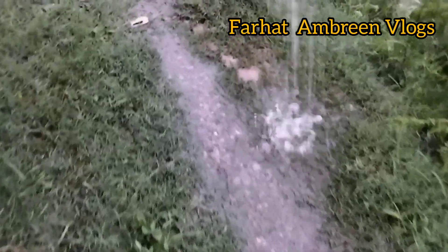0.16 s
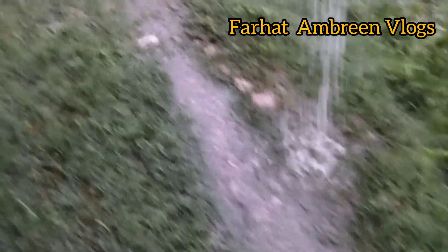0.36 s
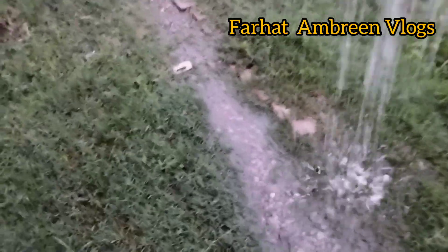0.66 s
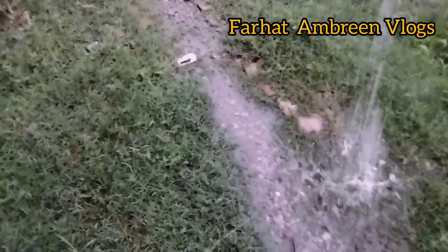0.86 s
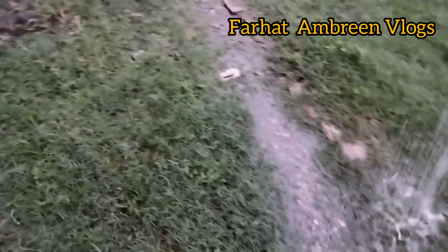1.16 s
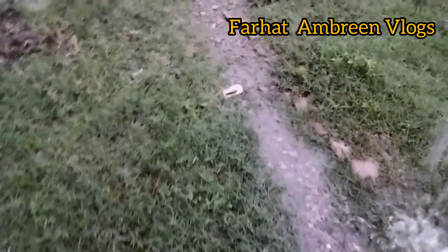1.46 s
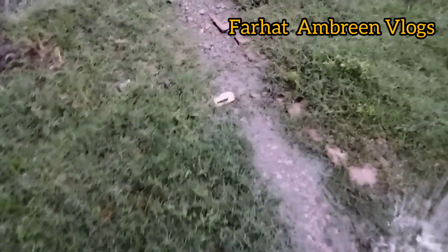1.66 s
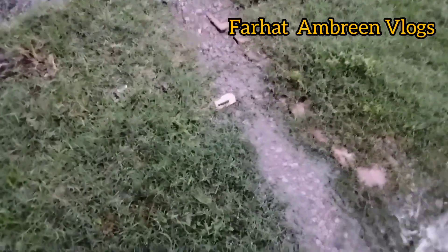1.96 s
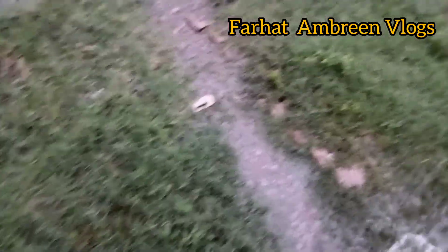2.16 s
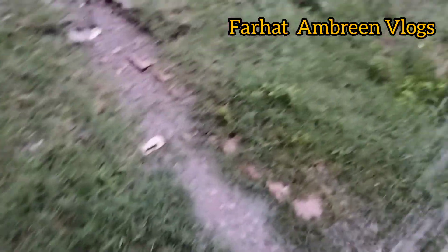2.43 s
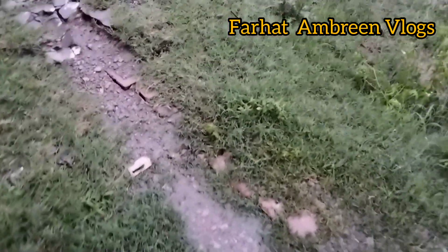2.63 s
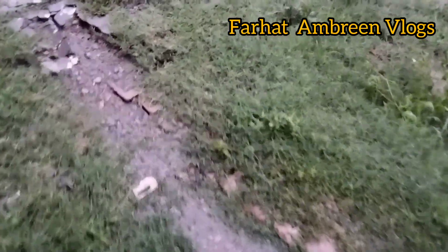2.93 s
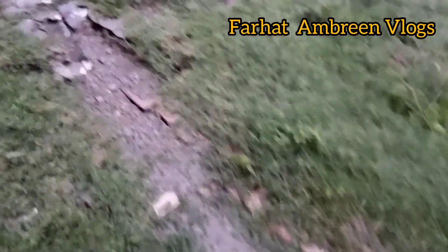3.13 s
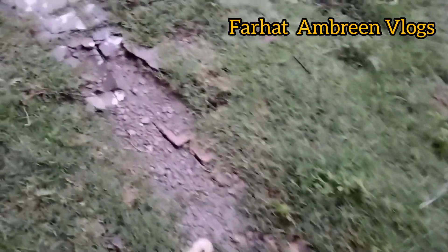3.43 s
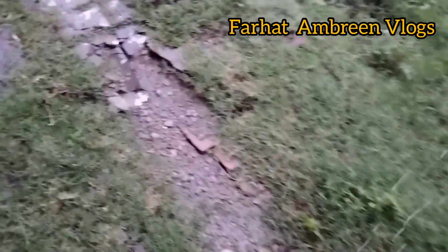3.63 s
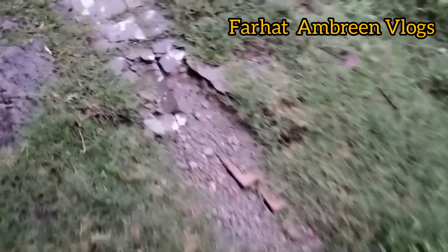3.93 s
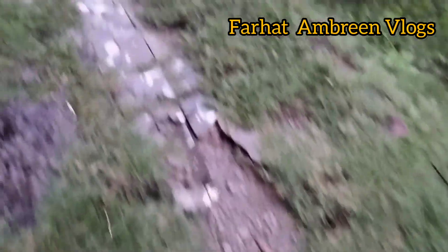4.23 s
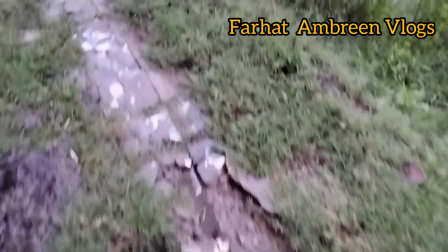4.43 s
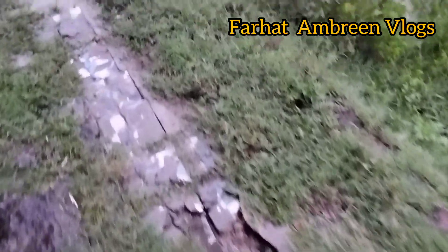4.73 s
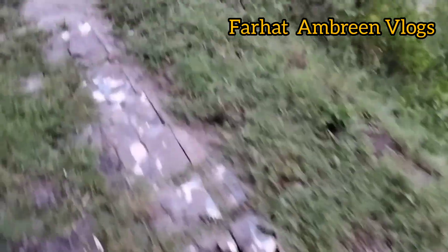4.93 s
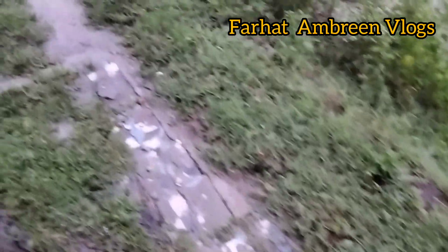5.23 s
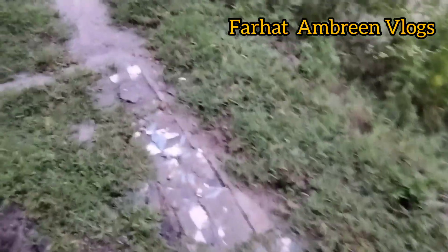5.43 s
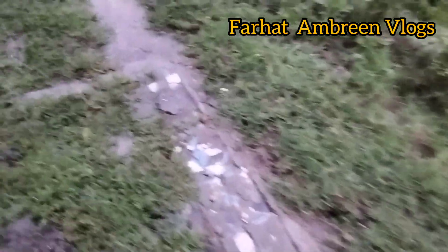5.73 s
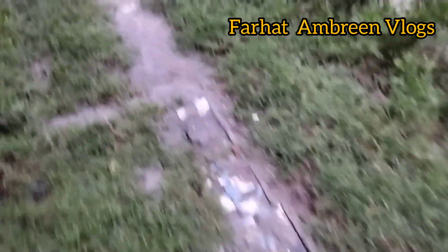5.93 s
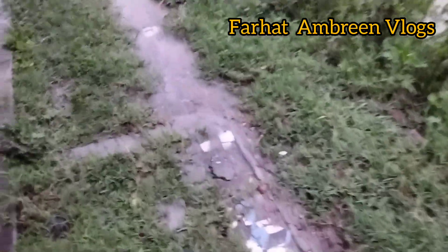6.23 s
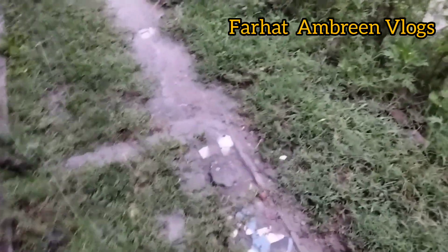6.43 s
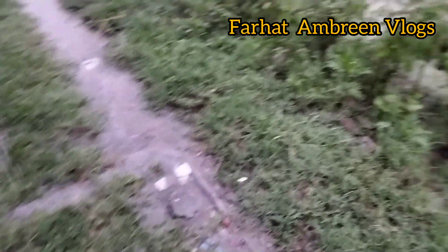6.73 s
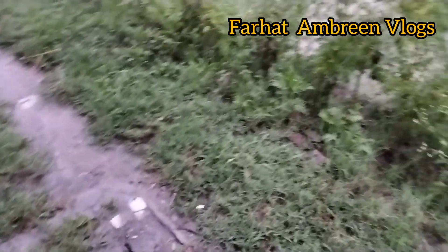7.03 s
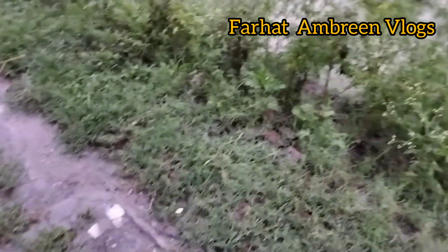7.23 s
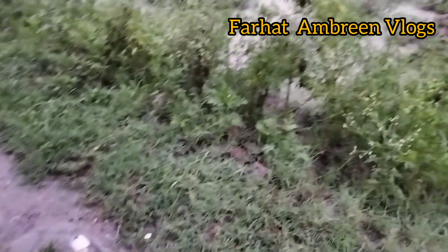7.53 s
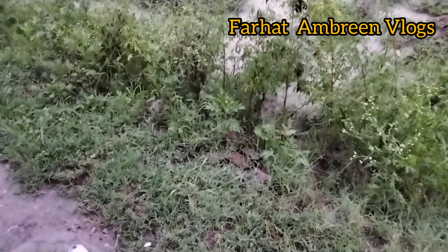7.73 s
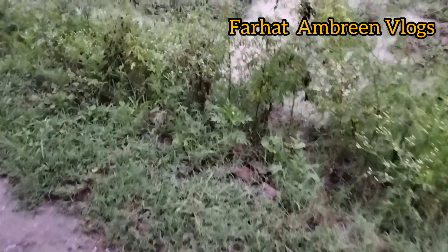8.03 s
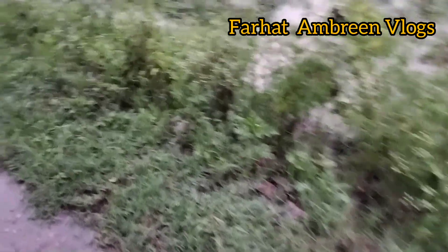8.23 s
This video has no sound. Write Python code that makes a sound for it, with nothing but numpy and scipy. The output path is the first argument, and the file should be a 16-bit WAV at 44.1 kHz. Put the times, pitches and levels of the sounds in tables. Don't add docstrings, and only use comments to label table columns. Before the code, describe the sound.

Roof runoff splatters hard on wet ground in heavy rain, drums loudly on something hollow, then fades to scattered slaps and drips.

```python
import sys
import numpy as np
from scipy import signal
from scipy.io import wavfile
from scipy.ndimage import uniform_filter1d

SR = 44100
rng = np.random.default_rng(int(sys.argv[2]) if len(sys.argv) > 2 else 0)


def master(y):
    cut = np.clip(np.atleast_2d(y).T, -1, 1)
    pcm = np.round(cut * 32767)
    wavfile.write(sys.argv[1], SR, pcm.astype(np.int16))


def gain_from_decibels(decibels):
    exponent = np.asarray(decibels, float) / 20
    return 10 ** exponent


N = 369116
TIME = np.arange(N) / SR

# time in seconds, low roar in dB, left over right in
# dB, brightness of the top in dB.
WEATHER = [(0.0, -20.5, -8, 5.5), (1.28, -27.5, -5, -0.9), (2.26, -28.5, -3.5, 1.5), (2.56, -18, -3.5, -2),
           (2.8, -23, -6.5, -8.5), (2.91, -14, -5.5, -10), (3.1, -25.5, -7.5, -4), (3.47, -21, -9, -6.5),
           (3.82, -28.5, -8, -2), (4.08, -30.5, -8, 4), (6.15, -31, -7, 5), (8.37, -30.5, -8, 1.5)]
# time in seconds, share that lands on the hollow thing (0-1),
# lag of the left port in samples.
AIM = [
    (0, 0, 2.5),
    (1.9, 0, 5),
    (2.08, 0.55, 3),
    (3.85, 0.25, 15.5),
    (4.0, 0.02, 6.5),
    (4.6, 0, -8.5),
    (8.37, 0.6, -10.5),
]


def evened(x):
    return x / np.sqrt(np.mean(x ** 2) + 1e-20)


def curve(rows, column):
    rows = np.asarray(rows)
    return np.interp(TIME, rows[:, 0], rows[:, column])


def colour(x, points):
    hz, db = np.transpose(points)
    bins_hz = abs(np.fft.fftfreq(8192, 1 / SR)) + 1
    gain_db = np.interp(np.log(bins_hz), np.log(hz), np.maximum(db, -100))
    log_gain = np.log(gain_from_decibels(gain_db))
    taps = np.fft.ifft(np.exp(np.conj(signal.hilbert(log_gain)))).real[:4096]
    taps = taps.reshape((1,) * (x.ndim - 1) + (-1,))
    return signal.oaconvolve(x, taps, axes=-1)[..., :N]


def drops(per_s, size_db, spread):
    chance, sign, place = rng.random((3, N))
    size = gain_from_decibels(size_db * np.minimum(rng.exponential(1, N), 3.2))
    clicks = size * np.sign(sign - 0.5) * (chance < per_s / SR)
    lag = np.round(curve(AIM, column=2) + spread * (2 * place - 1)).astype(int)
    left = np.bincount(np.clip(np.arange(N) + lag, 0, N - 1), clicks, N)
    return evened(np.array([left, clicks]))


def scatter(x, t60, wet_db, same):
    keep = gain_from_decibels(-120 / (t60 * SR))
    puff = np.sqrt(signal.lfilter([1 - keep], [1, -keep], x ** 2))
    common, left, right = rng.standard_normal((3, N))
    same = np.clip(same, 0, 1)
    lag = np.round(curve(AIM, column=2)).astype(int)
    late = common[np.clip(np.arange(N) - lag, 0, N - 1)]
    noise = same * np.array([late, common]) + np.sqrt(1 - same ** 2) * np.array([left, right])
    return evened(x + gain_from_decibels(wet_db) * puff * noise)


def patchy(x, patch_db):
    z = signal.stft(x, nperseg=512, noverlap=384)[2]
    field = rng.standard_normal(z.shape[1:])
    field = uniform_filter1d(field, size=7, axis=0)
    field = evened(uniform_filter1d(field, size=4, axis=1))
    return signal.istft(z * gain_from_decibels(patch_db * field), nperseg=512, noverlap=384)[1][:, :N]


def brighten(x):
    top = signal.sosfilt(signal.butter(1, [5800, 17000], "band", fs=SR, output="sos"), x)
    return x + (gain_from_decibels(curve(WEATHER, column=3)) - 1) * top


def rumble():
    # frequency in Hz, level in dB per Hz.
    roar_spectrum = [(12, -82), (22, 3), (38, 5.5), (130, 0.5), (215, 0.5), (468, -17), (900, -42),
                     (1170, -28), (1980, -120)]
    same, left, right = rng.standard_normal((3, N))
    both = same + 0.16 * np.array([left, right])
    return gain_from_decibels(curve(WEATHER, column=1) - 4.0) * evened(colour(both, roar_spectrum))


def rain():
    # frequency in Hz, level in dB per Hz.
    leaf_spectrum = [(200, -13), (500, -14.5), (1200, -14), (2500, -8.5), (5000, -8), (9000, -4),
                     (15000, -6.5)]
    calm_db, rain_db, follows = -28.5, -18.5, 0.28
    patter = scatter(drops(7000, size_db=6.5, spread=20), t60=0.054, wet_db=7.5, same=0.15)
    level_db = rain_db + follows * (curve(WEATHER, column=1) - calm_db) + 2.5
    return gain_from_decibels(level_db) * colour(patter, leaf_spectrum)


def slugs():
    # start in seconds, spray in dB, length in ms, body in dB.
    near_slugs = [(.04, -26.5, 59, -25), (.109, -23.5, 52, -33), (.23, -23.5, 32, -24),
                  (0.294, -19.5, 80, -29), (.388, -20, 42, -42), (.439, -17, 43, -38), (.527, -19, 55, -42),
                  (0.605, -15.5, 50, -27.5), (0.71, -18, 28, -50), (.765, -12, 19, -50),
                  (0.816, -15, 13, -45), (.87, -16, 49, -45), (.923, -14, 20, -22), (0.977, -16, 58, -48),
                  (1.016, -18.5, 62, -26.5), (1.1, -10.5, 11, -22), (1.141, -17.5, 40, -48),
                  (1.201, -18, 88, -27.5), (1.304, -19.5, 74, -29.5), (1.378, -14, 21.5, -22.5),
                  (1.415, -17.5, 110, -47), (1.494, -14, 14, -18), (1.545, -17, 53, -24),
                  (1.625, -12.5, 36, -31.5), (1.679, -18, 84, -31), (1.758, -14, 50, -41),
                  (1.85, -15.5, 69, -31), (1.944, -15.5, 30, -29.5), (2.007, -17, 125, -30.5),
                  (2.104, -17.5, 57, -27)]
    # start in seconds, body in dB, length in ms, spray in dB.
    hollow_slugs = [(2.191, -18, 8.1, -12.5), (2.226, -33, 47, -19.5), (2.302, -22, 69, -17),
                    (2.382, -13.5, 4.4, -9), (2.42, -17.5, 67, -17.5), (2.493, -16.5, 32, -18),
                    (2.549, -14.5, 34, -15.5), (2.598, -17.5, 44, -19.5), (2.652, -8, 9.9, -13),
                    (2.682, -18, 98, -32), (2.815, -17, 64, -22), (2.845, -17.5, 100, -25),
                    (2.926, -13.5, 34, -30), (2.961, -8.5, 25, -14.5), (3.002, -17, 13, -28),
                    (3.05, -10.5, 22, -19), (3.106, -16.5, 200, -35), (3.233, -18, 28, -18),
                    (3.278, -18, 67, -34), (3.339, -14, 12, -26), (3.366, -14, 18, -21),
                    (3.402, -13, 48, -21), (3.457, -13, 30, -32), (3.503, -8.5, 9, -20),
                    (3.538, -8.5, 11, -25), (3.572, -13.5, 88, -27), (3.638, -19, 63, -38),
                    (3.722, -17.5, 31, -41), (3.839, -19.5, 38, -18), (3.888, -26.5, 72, -19.5)]
    # start in seconds, spray in dB, length in ms.
    far_slugs = [(3.981, -22, 110), (4.11, -21.5, 36), (4.228, -23, 44), (4.298, -19.5, 38),
                 (4.35, -22.5, 92), (4.501, -24, 58), (4.6, -16.5, 5.2), (4.663, -20.5, 26),
                 (4.759, -18.5, 22), (4.899, -23.5, 103), (5.017, -20.5, 20), (5.065, -20.5, 60),
                 (5.167, -17.5, 32), (5.249, -23, 99), (5.377, -18, 21), (5.498, -22, 32),
                 (5.594, -19.5, 22), (5.637, -19.5, 53), (5.794, -16.5, 28), (5.957, -21, 35),
                 (6.066, -22, 28), (6.157, -24.5, 27), (6.307, -24, 13), (6.457, -22, 41), (6.561, -21, 22),
                 (7.423, -31, 44), (7.534, -25.5, 49), (7.816, -24, 7.8), (7.88, -22, 20),
                 (8.052, -29, 100)]
    # time in seconds, level in dB.
    dribble_level = [
        (0, -49),
        (2.3, -41),
        (2.7, -56),
        (3.8, -50),
        (4.1, -29.5),
        (5.7, -33),
        (6.2, -30),
        (8.37, -26),
    ]
    near = np.array(near_slugs)[:, [0, 1, 3, 2]]
    hollow = np.array(hollow_slugs)[:, [0, 3, 1, 2]]
    s, spray_db, ms = np.transpose(far_slugs)
    plop_db = -15.5 + 1.5 * np.log2(ms / 10)
    far = np.transpose([s, spray_db, spray_db + plop_db, ms])

    gap, size, body, length = rng.standard_normal((400, 4)).T
    s = np.cumsum(np.exp(0.5 * gap)) / 26
    level_db = np.interp(s, *np.transpose(dribble_level))
    spray_db = level_db + 2.5 * np.clip(size, -2, 0.2)
    body_db = level_db - 7.5 + 1.5 * body
    small = np.transpose([s, spray_db, body_db, 22 * np.exp(0.5 * length)])
    return np.vstack([near, hollow, far, small[s < N / SR]])


def flow(rows, column, rise, fall):
    hold_share, lump_db, lump_ms = 0.84, 1.22, 13
    power, t = np.zeros(N), np.arange(8000) / SR
    for row in rows:
        after_hold = np.maximum(t - row[3] * hold_share / 1000, 0)
        shape = (1 - np.exp(-t / rise)) * np.exp(-after_hold / fall)
        part = power[round(row[0] * SR):][:len(t)]
        part += gain_from_decibels(2 * row[column]) * shape[:len(part)]
    width = round(lump_ms * SR / 1000)
    lumps = uniform_filter1d(rng.standard_normal(N), width)
    lumps = evened(uniform_filter1d(lumps, width))
    return np.sqrt(power) * gain_from_decibels(lump_db * np.clip(lumps, -3, 1.5))


def breaks():
    # end in seconds, length in ms, depth in dB.
    gaps = [(0.976, 14, -6), (1.547, 27, -3), (2.177, 15, -2), (2.225, 9.3, -2), (2.422, 7.5, -4),
            (2.816, 41, -3), (3.035, 20, -3), (3.37, 12, -5), (3.504, 13, -5), (3.979, 12, -7),
            (4.228, 15, -6), (4.299, 8.3, -4), (4.76, 25, -3), (5.148, 27, -3), (5.595, 16, -6),
            (7.025, 18, -1)]
    db = np.zeros(N)
    for end, ms, depth_db in gaps:
        sink = np.clip((TIME - end + ms / 1000) / 0.004, 0, 1)
        db += depth_db * sink * (TIME < end)
    return gain_from_decibels(db)


def drumming(rows):
    # frequency in Hz, level in dB per Hz.
    drum_spectrum = [(30, -5), (120, -14), (330, -1.3), (600, -4.5), (1000, -8), (2000, -12.5),
                     (4000, -17.5), (8000, -51)]
    # time in seconds, peak in dB, pitch in Hz.
    blows = [(2.071, -11.5, 388), (2.199, -13, 456), (2.2256, -15, 446), (2.3297, -15.5, 500.0),
             (2.3848, -9, 670.0), (2.4097, -10.5, 406), (2.425, -18, 585), (2.4574, -18, 440),
             (2.4661, -11, 370.0), (2.48, -13, 476), (2.4966, -15, 267), (2.511, -9, 260.0),
             (2.564, -8, 340.0), (2.5824, -17, 406), (2.592, -13, 430.0), (2.6021, -6, 430.0),
             (2.6328, -14, 420.0), (2.6439, -16, 398), (2.6589, -15, 540), (2.6677, -9, 350.0),
             (2.6842, -12, 350.0), (2.7028, -14, 450.0), (2.729, -5, 600), (2.7604, -19, 566),
             (2.7915, -16, 290.0), (2.819, -10, 350.0), (2.8352, -14, 650.0), (2.845, -12, 500.0),
             (2.8552, -10, 550.0), (2.8688, -19, 350.0), (2.8836, -12, 294), (2.8934, -13, 300.0),
             (2.915, -9.5, 322), (2.9265, -16, 290.0), (2.933, -14, 260.0), (2.9454, -20, 280.0),
             (2.9613, -7, 334), (2.9848, -16, 330.0), (3.004, -16, 490.0), (3.036, -13, 330.0),
             (3.0447, -15, 440.0), (3.053, -11, 493), (3.061, -14, 465), (3.0813, -15, 350.0),
             (3.15, -17, 443), (3.2063, -15, 390.0), (3.242, -13, 288), (3.3098, -14, 310.0),
             (3.3718, -7.5, 350.0), (3.404, -16, 330.0), (3.4113, -14, 370.0), (3.4339, -11, 356),
             (3.4632, -11.5, 348), (3.4775, -13, 620.0), (3.5097, -12, 470.0), (3.5442, -15.5, 370.0),
             (3.5874, -14, 400.0), (3.596, -9.5, 630.0), (3.643, -5.5, 366), (3.652, -14, 462)]
    knocks = scatter(drops(420, size_db=-1.0, spread=6.5), t60=0.02, wet_db=7.0, same=0.9)
    knocks = patchy(evened(colour(knocks, drum_spectrum)), patch_db=-0.5)
    share = np.clip(curve(AIM, column=1), 0, 1)
    out = gain_from_decibels(-2.5) * knocks * flow(rows, column=2, rise=0.0007, fall=0.012) * np.sqrt(share)
    t = np.arange(1500) / SR
    for s, db, hz in blows:
        ring = np.sin(2 * np.pi * hz * t) * np.exp(-t * hz / 0.82)
        overtone = 0.5 * np.sin(2 * np.pi * (1.97 * hz + 300) * t) * np.exp(-t / 0.0012)
        crack = 0.31 * rng.standard_normal(len(t)) * np.exp(-t / 0.0009)
        blow = gain_from_decibels(db + 3.0) * (ring + overtone + crack)
        at = round(s * SR)
        out[0, at + 9:][:1500] += blow
        out[1, at:][:1500] += blow
    return out


def bubble(hz, cycles):
    t = np.arange(1200) / SR
    tone = np.sin(2 * np.pi * hz * t * (1 + 4 * t))
    return tone * np.exp(-t * hz / cycles) * (1 - np.exp(-t / 0.00024))


def plops(rows):
    # time in seconds,
    # peak in dB, pitch in Hz.
    gulps = [(0.017, -20.5, 1220), (0.045, -23, 1480), (0.135, -14, 1490), (0.159, -16, 1430),
             (0.19, -17, 1250), (0.231, -25, 1420), (0.352, -25, 736), (0.462, -21, 1000),
             (0.538, -23, 1490), (0.614, -21, 1250), (0.928, -26, 1690), (0.993, -21, 1520),
             (1.018, -34, 1660), (1.035, -15.5, 1490), (1.104, -21, 1490), (1.246, -13.5, 1650),
             (1.275, -27, 800), (1.32, -24, 980), (1.358, -31, 760), (1.383, -28, 1430), (1.498, -24, 706),
             (1.55, -16.5, 1420), (1.575, -34, 800), (1.79, -26, 750), (1.955, -17, 861),
             (2.075, -15, 1490), (2.099, -12.5, 1650), (2.131, -24, 1360),
             (4.228, -25, 1220), (4.255, -24, 1230), (4.298, -25, 1960), (4.416, -23, 2000),
                 (4.493, -29, 1810), (4.586, -31, 1830), (4.668, -28, 1950), (5.056, -19, 1940),
                 (5.107, -15.5, 1450), (5.267, -26, 2000), (5.504, -25, 1410), (5.605, -26, 1800),
                 (5.68, -28, 1600), (5.71, -26, 1370), (5.768, -33, 1730), (5.899, -27, 864),
                 (6.344, -35, 606), (6.369, -24, 1960), (6.457, -33, 848), (6.563, -30, 1930),
                 (6.69, -30, 1010), (6.864, -27, 1700), (7.17, -24, 1550), (7.199, -29, 1460),
                 (7.277, -20, 1990), (7.444, -26, 1550), (7.535, -29, 1980), (7.609, -27, 1980),
                 (7.789, -23, 1600), (7.86, -30, 1800)]
    # time in seconds, peak in dB, pitch in Hz.
    blips = [(6.259, -29, 2700), (6.308, -31, 3300), (6.381, -24, 2770.0), (6.421, -22, 3200),
             (6.527, -27, 2990.0), (6.604, -23, 2800), (6.674, -19, 3570), (6.823, -29, 2450.0),
             (7.004, -25, 3080.0), (7.168, -26, 3340.0), (7.215, -27, 3120.0), (7.286, -24, 2720.0),
             (7.321, -24, 2720), (7.387, -25, 2500.0), (7.542, -28, 2750.0), (7.669, -26, 2740),
             (7.711, -24, 2570), (7.882, -32, 3120), (8.061, -28, 2620.0), (8.09, -24, 2670.0)]
    out = np.zeros((2, N))
    for hz in (730, 980, 1250, 1490, 1786, 2085, 2284, 2600, 2890):
        ring = bubble(hz, cycles=hz / 380)
        ring = ring[None] / np.linalg.norm(ring)
        out += signal.oaconvolve(drops(50, size_db=2.0, spread=15.0), ring, axes=1)[:, :N]
    on_ground = np.clip(1 - curve(AIM, column=1), 0, 1)
    out = gain_from_decibels(-6.5) * evened(out) * flow(rows, column=2, rise=0.00068, fall=0.0018) * on_ground ** 2
    for s, db, hz in gulps:
        at = round(s * SR)
        out[0, at + 12:][:1200] += gain_from_decibels(db - 9) * bubble(hz, cycles=1.4)
        out[1, at:][:1200] += gain_from_decibels(db + 6.0) * bubble(hz, cycles=2.1)
    for s, db, hz in blips:
        out[:, round(s * SR):][:, :1200] += gain_from_decibels(db + 0.5) * bubble(hz, cycles=11.0)
    return out


def fizz(per_s, size_db, spread, t60, wet_db):
    out = 1.26 * scatter(drops(per_s, size_db, spread), t60, wet_db, same=1.0)
    for hz in np.geomspace(900, 12000, num=6):
        band = signal.butter(1, [hz / 1.2, hz * 1.34], "band", fs=SR, output="sos")
        droplets = drops(per_s * hz / 12000, size_db, spread)
        out += signal.sosfilt(band, scatter(droplets, t60, wet_db, same=0.099))
    return evened(out)


def spray(rows):
    # frequency in Hz, level in dB per Hz.
    spray_spectrum = [(200, -21), (600, -58), (1200, -18.5), (2500, -2.5), (5000, 0.8), (9000, 2.5),
                      (15000, 0.5)]
    # time in seconds, peak in dB.
    near_slaps = [(0.0795, -4), (0.1087, -8), (0.1351, -7), (0.162, -9), (0.1895, -10), (0.232, -3),
                  (0.3012, -10), (0.3243, -5), (0.4105, -7), (0.4419, -9), (0.5297, -7), (0.607, -6),
                  (0.6848, -22), (0.7108, -14), (0.7257, -5), (0.772, -1), (0.818, -6), (0.8583, -1),
                  (0.8719, -2), (0.929, -7), (0.976, -10), (1.017, 0), (1.056, -6), (1.1036, -6),
                  (1.1458, -11), (1.2043, 0), (1.2451, -19), (1.3175, 1), (1.3818, -13), (1.4661, -11),
                  (1.4965, -8), (1.5474, -7), (1.5918, 5), (1.627, -4), (1.7203, -10), (1.7586, -4),
                  (1.8432, -20), (1.8532, -3), (1.9445, -17), (2.0083, -10), (2.055, -10)]
    # time in seconds, peak in dB.
    hollow_slaps = [(2.1756, -3), (2.1944, -8), (2.226, -2), (2.3005, -1), (2.3843, -11), (2.4222, -3),
                    (2.4681, -15), (2.5095, -9), (2.5474, -6), (2.5983, -14), (2.6432, -16), (2.6574, -9),
                    (2.7465, -16), (2.7904, -26), (2.8176, 1), (2.8542, -7), (2.9261, -1), (2.962, -4),
                    (3.0343, -2), (3.0513, -8), (3.1057, -16), (3.1491, -7), (3.2384, -13), (3.2907, -12),
                    (3.3105, -8), (3.3424, 1), (3.3711, -11), (3.4075, -14), (3.456, -8), (3.5048, -13),
                    (3.5387, -12), (3.5955, -6), (3.6404, -17), (3.7218, -27), (3.8355, -11), (3.845, -9),
                    (3.8909, -13)]
    # time in seconds, peak in dB.
    far_slaps = [(3.8914, -7), (3.98, -16), (4.0151, -14), (4.1103, -4), (4.2106, -17), (4.2275, 0),
                 (4.256, -12), (4.301, -8), (4.3615, -2), (4.47, -8), (4.498, -2.5), (4.5808, -6),
                 (4.6004, -10), (4.6701, -12), (4.6994, -7), (4.726, -6), (4.7614, -10), (4.823, -2.5),
                 (4.9066, -3), (4.961, -8), (5.0198, -11), (5.0664, -17), (5.106, -6), (5.1473, -5),
                 (5.1739, -16), (5.2557, -6), (5.3126, -9), (5.345, -7), (5.379, -18), (5.396, -7),
                 (5.4634, -12), (5.5077, 0.5), (5.596, -14), (5.6442, -4), (5.6986, -6), (5.7776, -11),
                 (5.797, -11), (5.8549, -18), (5.9108, -9.5), (5.9456, -7), (6.045, -19), (6.0688, -8),
                 (6.1197, -10), (6.1647, -10), (6.209, -2), (6.31, -7), (6.46, -14), (6.5243, -9),
                 (6.5608, -15), (6.671, -10), (6.7653, -16), (6.8317, -11), (7.3889, -16), (7.4253, -27),
                 (7.5435, -5), (7.6693, -10), (7.817, -9), (7.8804, -10), (8.0673, -8), (8.222, -5)]
    crackle = fizz(2200, size_db=4.0, spread=10.5, t60=0.012, wet_db=0.0)
    crackle *= flow(rows, column=1, rise=0.0009, fall=0.0043)
    slaps, t = np.zeros((2, N)), np.arange(600) / SR
    shape = np.exp(-t / 0.0005) + 0.4 * np.exp(-t / 0.004)
    for s, db in near_slaps + hollow_slaps + far_slaps:
        burst = rng.standard_normal((2, 600)) * shape
        burst = burst + 0.14 * burst[::-1]
        slaps[:, round(s * SR):][:, :600] += gain_from_decibels(db - 5.5) * burst
    slaps = signal.sosfilt(signal.butter(1, 2600, "high", fs=SR, output="sos"), slaps)
    return gain_from_decibels(1.2) * colour(gain_from_decibels(-0.96) * crackle + slaps, spray_spectrum)


def scene():
    rows = slugs()
    lean = gain_from_decibels(np.outer([0.5, -0.5], curve(WEATHER, column=2) + 6.98))
    water = patchy(brighten(spray(rows) + rain()), patch_db=2.5) * lean * breaks()
    return water + plops(rows) + drumming(rows) + rumble()


def gate(x):
    below_db, depth_db = -4.3, -18
    hz, _, z = signal.stft(x, SR, nperseg=1024, noverlap=768)
    power = uniform_filter1d((abs(z) ** 2).sum(axis=0), size=6, axis=1)
    power = power / (power.mean(axis=1, keepdims=True) + 1e-20)
    neighbours = uniform_filter1d(power, size=40, axis=0)
    weak = uniform_filter1d(power, size=4, axis=0) < gain_from_decibels(2 * below_db) * neighbours
    weak &= (((hz > 1600) & (hz < 4200)) | (hz > 9000))[:, None]
    shut = uniform_filter1d(weak * 1.0, size=3, axis=0)
    shut = np.clip(3 * uniform_filter1d(shut, size=5, axis=1), 0, 1)
    return signal.istft(z * gain_from_decibels(depth_db * shut), SR, nperseg=1024, noverlap=768)[1][:, :N]


def band_limit(x):
    return signal.sosfilt(signal.butter(12, 15430, fs=SR, output="sos"), x)


def record(dry):
    # frequency in Hz, gain in dB.
    left_port = [(300, -0.2), (1500, 0), (3000, -2), (5500, -5), (6500, -3), (7600, -0.5), (8500, -7.5),
                 (10000, -14.5), (13000, -20.5), (15000, -51)]
    # frequency in Hz, gain in dB.
    right_port = [(300, -0.3), (1500, 2), (3300, 2), (4400, 4.5), (5000, 7), (5400, 9), (5800, 6.5),
                  (6400, -0.5), (7500, -9.5), (9300, -20.5), (12000, -17.5), (15000, -15.5)]
    edge_hz, ceiling = 14400, 0.98
    ports = np.array([colour(dry[0], left_port), colour(dry[1], right_port)])
    ports = ceiling * np.tanh(ports / ceiling)
    low_pass = signal.firwin(511, edge_hz, window=("kaiser", 9), fs=SR)
    ports = signal.oaconvolve(ports, low_pass[None], "same")
    return band_limit(gate(ports))


dry = scene()
out = record(dry)
master(out)
```